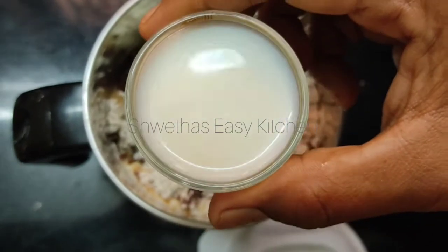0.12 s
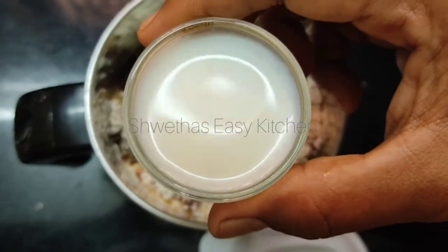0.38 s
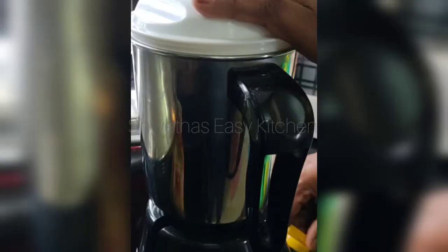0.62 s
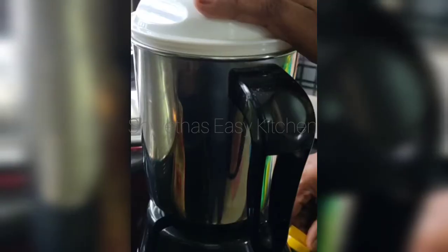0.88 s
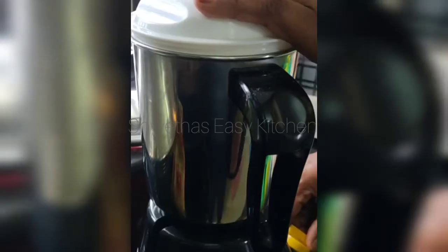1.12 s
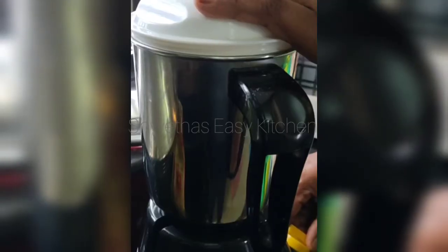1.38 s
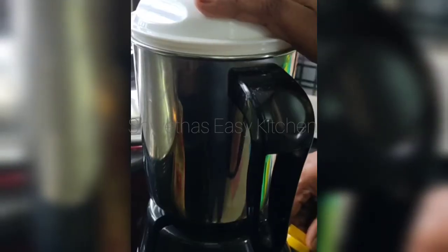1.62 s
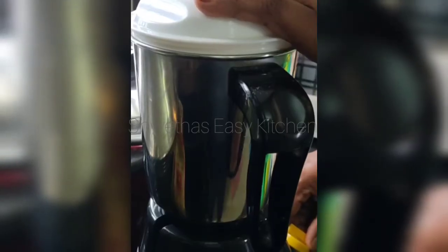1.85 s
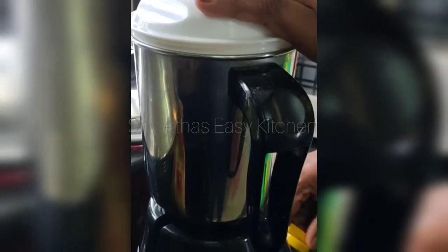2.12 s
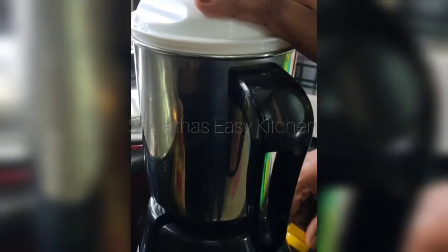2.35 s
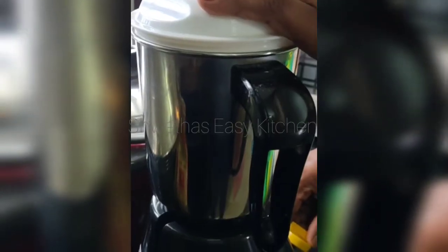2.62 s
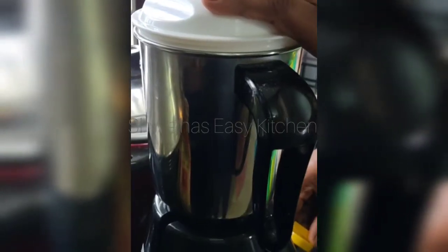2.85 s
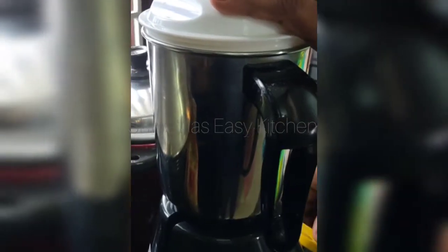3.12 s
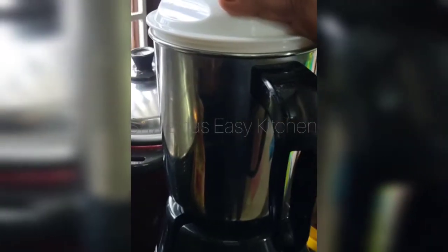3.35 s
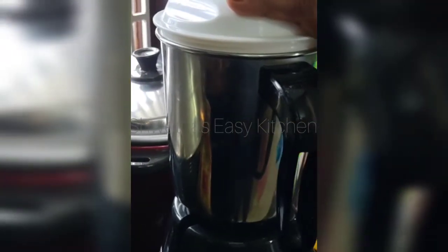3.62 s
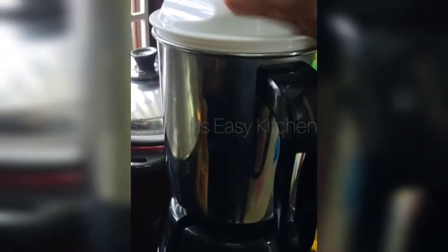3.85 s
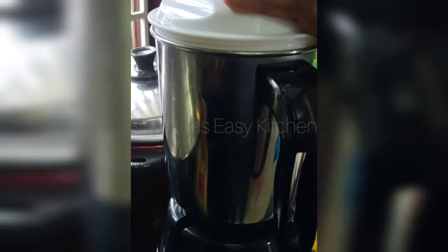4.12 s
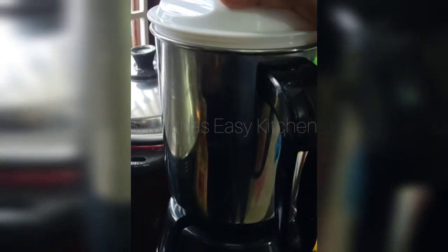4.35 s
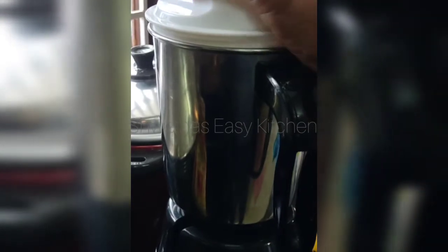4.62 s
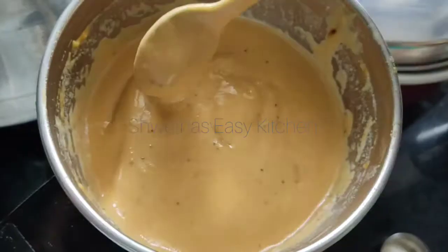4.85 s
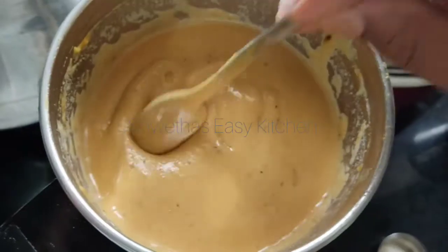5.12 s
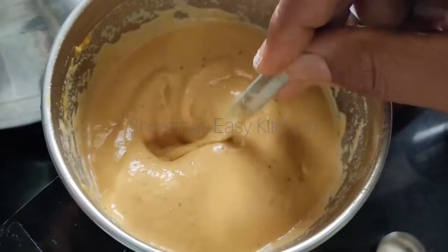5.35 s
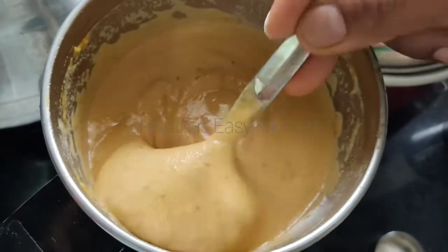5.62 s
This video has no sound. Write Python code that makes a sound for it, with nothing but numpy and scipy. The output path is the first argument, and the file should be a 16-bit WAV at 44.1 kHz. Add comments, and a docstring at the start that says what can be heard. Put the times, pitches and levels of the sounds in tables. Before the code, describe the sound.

From 0 to 0.6 s there is only quiet kitchen air: low murmur, faint hiss and a wavering hum near 190 Hz, strongest at the very start. After a tiny silent gap, a mixer grinder fades in quickly at 0.64 s, already at speed and close to a handheld stereo microphone. A broad, rough motor drone mixes with steel jar resonance, wet batter slosh and bright buzzing grit pulsing about 216 times a second. Lumps make it surge irregularly, with small hard clicks, notably near 2.9 s. It switches off at 3.0 s, coasting down within a fraction of a second with a soft jolt, restarts at 3.24 s, and stops at 4.19 s, fading quickly into room air. A faint bright rustle comes near 4.67 s. After a short silence, quiet, slightly hissier air fades in from 4.76 s, with one tiny, high spoon tick at 5.17 s.

```python
"""A low murmur, a faint hiss and a wavering hum of quiet kitchen air come first; a mixer grinder then runs
in two bursts near a two-port handheld microphone, and quiet air with one spoon tick closes the scene.
The motor drone and steel jar are noise shaped by resonances; slosh and grit are noise puffed once a turn.
All four coast down after each burst. The tick is damped sines with noise cracks, the rustle a treble swell.
Short silent gaps part three passages, each with its own fade-in."""
import sys
import numpy as np
from scipy import signal
from scipy.fft import rfft, irfft, next_fast_len
from scipy.io import wavfile
from scipy.ndimage import uniform_filter1d, minimum_filter1d, map_coordinates

SR = 44100
rng = np.random.default_rng(int(sys.argv[2]) if len(sys.argv) > 2 else 0)


def persist_wave(psi):
    """Save psi, clipped to +-1, as 16-bit WAV."""
    counts = np.round(np.clip(psi, -1, 1) * 32767).astype(np.int16)
    wavfile.write(sys.argv[1], SR, np.atleast_2d(counts).T)


def convert_level_to_amplitude(level_db):
    """Map a level in decibels to its linear amplitude factor."""
    exponent = np.asarray(level_db, float) / 20
    return 10 ** exponent


N = 252516  # samples


def unit(x):
    """Normalisation to rms 1."""
    return x / np.sqrt(np.mean(x ** 2) + 1e-20)


def along(points, hz):
    """Linear interpolation of (f/Hz, value) points on a logarithmic frequency axis."""
    f, v = np.transpose(points)
    return np.interp(np.log(hz + 1), np.log(f + 1), v)


def wobble(rate):
    """Slow random modulation: a spline through random knots, rate knots a second."""
    return map_coordinates(rng.standard_normal(int(N * rate / SR) + 4), [np.arange(N) * rate / SR])


def bump(s, half):
    """Gaussian envelope of height 1, centred at s."""
    return np.exp(-((np.arange(N) / SR - s) / half) ** 2)


def filtered(x, response):
    """Linear filtering: the spectrum of x times a complex frequency response."""
    m = next_fast_len(N + SR // 2)
    spectrum = rfft(x, m) * response(np.fft.rfftfreq(m, 1 / SR))
    return irfft(spectrum, m)[..., :N]


def noise(patchy_db):
    """Gaussian noise pair whose time-frequency patches share one random gain."""
    z = signal.stft(rng.standard_normal((2, N)), nperseg=512)[2]
    field = uniform_filter1d(rng.standard_normal(z.shape[1:]), size=6, axis=0)
    field = uniform_filter1d(field, size=8, axis=1)
    return signal.istft(z * convert_level_to_amplitude(patchy_db * unit(field)), nperseg=512)[1][:, :N]


def humps(modes, hz):
    """Lorentzian resonance: summed power of (f/Hz, width/Hz, level/dB) modes."""
    return sum(convert_level_to_amplitude(2 * db) / (1 + (2 * (hz - c) / w) ** 2) for c, w, db in modes)


def ring(events, life, attack):
    """Free decay of modes (t/s, level/dB, f/Hz): damped sines losing 60 dB in life seconds."""
    out, t = np.zeros(N + SR), np.arange(SR // 4) / SR
    for s, db, hz in events:
        envelope = convert_level_to_amplitude(db - 60 * t / life) * (1 - np.exp(-t / attack))
        out[round(s * SR):][:len(t)] += envelope * np.sin(2 * np.pi * hz * t)
    return out[:N]


def cracks(events, life):
    """Impulsive excitation at (t/s, level/dB): stereo noise losing 60 dB in life seconds."""
    out, t = np.zeros((2, N + SR)), np.arange(SR // 20) / SR
    for s, db in events:
        out[:, round(s * SR):][:, :len(t)] += convert_level_to_amplitude(db - 60 * t / life) * rng.standard_normal((2, len(t)))
    return out[:, :N]


# Correlation of left and right port: (f/Hz, likeness)
LIKENESS = [(40, .5), (100, .85), (200, .95), (450, .87), (640, .5), (800, .75), (1200, .4), (1600, .65),
            (2200, .25), (8000, .25)]
# Phase by which left leads right: (f/Hz, phase/rad)
PHASE_LEAD = [(0, -0.5), (780, 0.2), (2330, -5.5), (4910, -13.0), (5250, -14.5), (6290, -17.5),
              (7240, -17.5), (7670, -19.5), (10300, -16.5), (10900, -16.5), (11600, -43.5), (14100, -38.5),
              (14700, -44.5), (15300, -34.5)]
# Left minus right: (f/Hz, level/dB)
BALANCE = [(60, -16.5), (99, 0.5), (160, 0.5), (270, 3.5), (450, 7), (740, -2), (1220, 2.5), (2010, -1.5),
           (3330, 2.5), (5500, -1.5), (9080, 1), (15000, -5)]


def at_ports(pair, colour, alike=LIKENESS, lead=PHASE_LEAD, sides=BALANCE):
    """Interaural-style cues: two drives mixed to a set coherence, phase lead and balance; mid rms 1."""
    turn = lambda hz: np.arccos(np.clip(along(alike, hz), 0, 1)) / 2
    mid, side = filtered(pair, lambda hz: colour(hz) * [np.cos(turn(hz)), np.sin(turn(hz))])
    # each port takes half of the level and phase difference
    half = lambda hz: convert_level_to_amplitude(along(sides, hz) / 2) * np.exp(.5j * np.interp(hz, *np.transpose(lead)))
    both = filtered([mid + side, mid - side], lambda hz: [half(hz), 1 / half(hz)])
    return both / np.std(both.mean(axis=0))


def diffuse(pair, colour):
    """Diffuse field: coherence of the ports vanishes in the treble, with no lead and no imbalance."""
    coherence = [(60, .5), (290, .8), (700, .3), (1400, 0)]  # (f/Hz, likeness)
    return at_ports(pair, colour, coherence, lead=[(0, 0), (1, 0)], sides=[(1, 0)])


# Room murmur, relative spectral density: (f/Hz, level/dB)
MURMUR_SPECTRUM = [(35, -33), (60, -12.5), (176, -6.5), (210, -12.5), (275, -5), (429, -9.5), (592, -18),
                   (696, -14), (1500, -24.5), (1950, -44.5), (3300, -120)]


def murmur():
    """Coloured noise: the low background of the room, rms 1."""
    return diffuse(noise(patchy_db=1.5), lambda f: convert_level_to_amplitude(along(MURMUR_SPECTRUM, f)))


# Room hiss, relative spectral density: (f/Hz, level/dB)
HISS_SPECTRUM = [(300, -20), (900, -8.5), (2000, -3), (5000, -11), (9000, -11), (16000, -5.5)]


def hiss():
    """Coloured noise: the faint treble background, rms 1."""
    return diffuse(noise(patchy_db=2.2), lambda f: convert_level_to_amplitude(along(HISS_SPECTRUM, f)))


def draught():
    """Turbulent pressure noise: slow air on the ports, falling off above 14 Hz, rms 1."""
    return diffuse(noise(patchy_db=1.5), lambda f: f / (f + 3) / (1 + (f / 14) ** 2) ** 0.76)


def hum():
    """Frequency and amplitude modulation of a sine: a far appliance, in the first passage only."""
    t = np.arange(N) / SR
    # settled rms level, louder opening, waver
    hum_db = -59 + 11 * np.exp(-(t / .058) ** 4) + 4.5 * wobble(27)
    phase = 2 * np.pi * np.cumsum(186 * (1 + 0.022 * wobble(26.5))) / SR  # wavers about 186 Hz
    return np.sqrt(2) * convert_level_to_amplitude(hum_db) * np.sin(phase) * (t <= PASSAGES[0][1])


# Air of each passage: (murmur level/dB, hiss level/dB before a common trim, left minus right level/dB)
AIR_LEVELS = [(-54.5, -56, 4.3), (-52.5, -57, 6), (-52, -49.5, 3.5)]


def kitchen():
    """Superposition of murmur, hiss, draught and hum, with a level balance for each passage."""
    passage = np.searchsorted([p[1] for p in PASSAGES[:-1]], np.arange(N) / SR)
    murmur_db, hiss_db, pan_db = np.array(AIR_LEVELS)[passage].T
    air = convert_level_to_amplitude(murmur_db) * murmur() + convert_level_to_amplitude(hiss_db - 4.5) * hiss() + convert_level_to_amplitude(murmur_db - 2.5) * draught()
    return (air + hum()) * convert_level_to_amplitude([pan_db / 2, -pan_db / 2])


# Lumps of food meet the blade: (t/s, level/dB, half length/s)
LUMPS = [(.972, 2.4, .04), (1.098, 2.6, .018), (1.24, 1.3, .11), (1.444, 1.9, .05), (1.62, 1.2, .09),
         (1.89, 1.4, .1), (2.062, 3, .022), (2.248, 2.4, .035), (2.355, 2.6, .032), (2.42, 1.5, .035),
         (2.665, 1.9, .047), (2.87, 1.3, .07), (3.397, 2.7, .07), (3.54, 2, .06), (3.788, 2.1, .026),
         (3.96, 2.2, .06), (4.166, 2.5, .042)]


def surges():
    """Load modulation: the swell in dB that each lump adds to every running layer."""
    return sum(db * bump(s, half) for s, db, half in LUMPS)


# The switch: (on t/s, off t/s, drag of the batter as a factor on the coasting loss)
SWITCHING = [(0.3, 2.99, .72), (3.241, 4.188, 1.0)]


def follow(law, surge_db):
    """Rotational inertia: gain spins up at switch-on, drops quickly and coasts down after switch-off."""
    running_db, rise, drop_db, coast_db = law
    t, power = np.arange(N) / SR, 0
    for on, off, drag in SWITCHING:
        idle = np.maximum(t - off, 0)
        up = 1 - np.exp(-(np.maximum(t - on, 0) / rise) ** 1.5)
        quick_drop = drop_db * (1 - np.exp(-idle / .042))
        power = power + (up * convert_level_to_amplitude(-quick_drop - drag * coast_db * idle)) ** 2
    start, end, _ = PASSAGES[1]  # opens with the motor already on
    return convert_level_to_amplitude(running_db + surge_db) * np.sqrt(power) * (t > start) * (t < end)


# Base and counter modes: (f/Hz, width/Hz, level/dB over the broad drone)
BASE_MODES = [(116, 8.9, 14), (190, 12, 15.5), (225, 8.4, 5.5), (293.7, 23.4, 9.5), (340, 24, 11.5),
              (403, 34, 8.5), (580, 15, 9), (778, 130, 6), (902, 16, 7.5), (1182, 65, 6.5), (1276, 22, 5.5),
              (1543, 18, 3), (1763, 69, 9)]
# Broad drone, relative spectral density: (f/Hz, level/dB)
DRONE_SPECTRUM = [(20, -33), (60, -24.5), (120, -11), (250, -3.5), (480, -4), (640, -4.5), (1000, -0.5),
                  (1600, 0), (2500, -11.5), (4000, -39.5), (20000, -88)]
# (running level/dB, spin-up/s, quick drop/dB, coasting loss in dB/s at drag 1)
DRONE_SWITCH = (-21.3, .04, 2.5, 76)


def drone(load, surge_db):
    """Forced vibration: broad motor noise drives the resonances of base and counter."""
    body = lambda f: convert_level_to_amplitude(along(DRONE_SPECTRUM, f)) * np.sqrt(1 + humps(BASE_MODES, f))
    drive = convert_level_to_amplitude(0.55 * load + 0.6 * wobble(45)) * noise(patchy_db=0.5)
    return follow(DRONE_SWITCH, surge_db) * at_ports(drive, body)


# Steel jar modes: (f/Hz, width/Hz, relative level/dB)
JAR_MODES = [(373, 14, -8.5), (460, 11.6, -0.5), (1082, 9.7, 1), (1078, 42, -7.5), (1180, 14, -13.5),
             (1784, 19, -9)]
# (running level/dB, spin-up/s, quick drop/dB, coasting loss in dB/s at drag 1)
JAR_SWITCH = (-27, .04, 1.5, 64)


def jar(surge_db):
    """Modal resonance: noise excites the jar, with uneven strength as the wall is struck unevenly."""
    colour = lambda f: np.sqrt(humps(JAR_MODES, f)) * f * f / (f * f + 250 ** 2)
    ringing = at_ports(noise(patchy_db=0.3), colour)
    return follow(JAR_SWITCH, surge_db) * ringing * convert_level_to_amplitude(3 * wobble(19))


def puffs():
    """Periodic amplitude modulation: one decaying puff a turn, of random strength."""
    shaft_hz = 215.9 * (1 + .07 * wobble(30))
    turns = np.cumsum(shaft_hz) / SR
    hard = rng.exponential(size=int(turns[-1]) + 1)  # turns differ in how much grit they throw
    return 0.74 + hard[turns.astype(int)] * 0.8 * np.exp(-5.5 * (turns % 1))


# Batter slosh, relative spectral density: (f/Hz, level/dB)
SLOSH_SPECTRUM = [(800, -63), (1900, -6.5), (2600, 0), (3600, -1.5), (5500, -10), (8000, -11.5),
                  (16000, -22.5)]
# (running level/dB, spin-up/s, quick drop/dB, coasting loss in dB/s at drag 1)
SLOSH_SWITCH = (-29.2, .04, 8, 66)


def slosh(load, puff, surge_db):
    """Modulated flow noise: batter carries a softened form of the puffs."""
    drive = convert_level_to_amplitude(0.36 * load) * puff ** 0.44 * noise(patchy_db=1.5)
    return follow(SLOSH_SWITCH, surge_db) * at_ports(drive, lambda f: convert_level_to_amplitude(along(SLOSH_SPECTRUM, f)))


# Flung grit, relative spectral density: (f/Hz, level/dB)
GRIT_SPECTRUM = [(1000, -47.5), (4000, -14.5), (6000, -2), (10000, -0.5), (16000, 0.5)]
# (running level/dB, spin-up/s, quick drop/dB, coasting loss in dB/s at drag 1)
GRIT_SWITCH = (-29.4, .042, 14, 115)


def grit(load, puff, surge_db):
    """Modulated impact noise: the blade flings grit at the wall in full puffs."""
    drive = convert_level_to_amplitude(0.47 * load) * puff * noise(patchy_db=0.7)
    return follow(GRIT_SWITCH, surge_db) * at_ports(drive, lambda f: convert_level_to_amplitude(along(GRIT_SPECTRUM, f)))


# Hard bits on the jar wall: (t/s, relative level/dB)
HARD_BITS = [(1.059, -9.5), (1.2281, -10), (1.736, -11.5), (1.8402, -5), (1.9051, -9), (1.9275, -6.5),
             (2.0492, -8.5), (2.1241, -6), (2.2584, -3.5), (2.622, -7.5), (2.902, -5), (2.9183, 0),
             (3.8292, -8)]


def chips():
    """Impact radiation: short noise bursts, high-passed near 5 kHz."""
    return convert_level_to_amplitude(-6.5) * filtered(cracks(HARD_BITS, life=0.023), lambda f: f * f / (f * f + 5000 ** 2))


# The motor jolts the base at the switch: (t/s, relative level/dB)
SWITCH_JOLTS = [(3.018, -14), (3.240, -20), (3.249, -11.5), (4.18, -20)]


def jolts():
    """Impulse response of modes: a soft push rings the low modes of the base."""
    low_modes = [(hz, level) for hz, _, level in BASE_MODES if 150 < hz < 450]
    events = [(s, db + level - 14.5, hz) for s, db in SWITCH_JOLTS for hz, level in low_modes]
    return ring(events, life=0.11, attack=0.0045) * convert_level_to_amplitude([[1.5], [-1.5]])


def grinder():
    """Superposition of layers under a common load: drone, jar, slosh, grit, chips and jolts."""
    surge_db = surges()
    load = wobble(11)  # shared by drone, slosh and grit
    puff = puffs()
    running = drone(load, surge_db) + jar(surge_db) + slosh(load, puff, surge_db) + grit(load, puff, surge_db)
    return running + chips() + jolts()


# Brief bright rustle by the lid: (t/s, level/dB, half length/s)
LID_RUSTLE = (4.665, -56, .025)


def rustle():
    """Friction noise: high-passed noise under a Gaussian swell."""
    s, db, half = LID_RUSTLE
    return convert_level_to_amplitude(db) * bump(s, half) * unit(filtered(noise(patchy_db=2.5), lambda f: f / (f + 3000)))


# Spoon on the rim, a tick and its bounces: (t/s, relative level/dB, f/Hz)
SPOON_TICKS = [(5.1665, -18.5, 9350), (5.1702, -25, 9260), (5.1745, -36, 9100)]


def spoon():
    """Impact and reverberation: damped sines nearer the left port, thin cracks and a short room tail."""
    tick = ring(SPOON_TICKS, life=0.0072, attack=.0002) * convert_level_to_amplitude([[3], [-3.5]])
    strikes = [(s, db + 1) for s, db, _ in SPOON_TICKS]
    crack = filtered(cracks(strikes, life=.02), lambda f: (f / 14000) ** 3)
    direct = tick + crack
    t = np.arange(SR // 8) / SR
    tail = rng.standard_normal((2, len(t))) * convert_level_to_amplitude(-60 * t / 0.2 - 36)  # 60 dB decay in 0.2 s
    return convert_level_to_amplitude(-6) * (direct + signal.fftconvolve(direct, tail, axes=1)[:, :N])


def scene():
    """Linear superposition of all sources of the kitchen."""
    return kitchen() + grinder() + rustle() + spoon()


# Left and right microphone port resonance: (f/Hz, width/Hz)
PORT_MODES = [(8890, 1870), (7880, 1350)]
# Treble fade of both ports: (f/Hz, level/dB)
PORT_FADE = [(8500, 0), (9400, -4.5), (10000, -17), (10600, -22.5), (12500, -11), (14300, -14.5),
             (15500, -18.5)]


def through_ports(x):
    """Cavity resonance: each port rings near 8 to 9 kHz, with a fade above."""
    resonance = lambda f, c, w: c * c / (c * c - f * f + 1j * f * w)
    return filtered(x, lambda f: [resonance(f, c, w) * convert_level_to_amplitude(along(PORT_FADE, f)) for c, w in PORT_MODES])


# Passages joined with silent gaps: (start t/s, end t/s, fade-in/s)
PASSAGES = [(-1, .605, .3), (.636, 4.7, .3), (4.76, 6, .36)]


def joined(x):
    """Amplitude gating: sine fade-in for each passage, silence between."""
    t, gain = np.arange(N) / SR, 0
    for start, end, fade in PASSAGES:
        progress = np.clip((t - start + .026) / fade, 0, 1)  # 26 ms under way as the passage opens
        gain = gain + np.sin(np.pi / 2 * progress) * (t > start) * (t < end)
    return x * gain


def limited(x, top):
    """Peak limiting: the recorder ducks briefly around its highest peaks."""
    need = np.minimum(1, top / (np.abs(x).max(axis=0) + 1e-9))
    return x * uniform_filter1d(minimum_filter1d(need, size=301), size=301)


def low_pass(x):
    """Removes everything above the highest recorded frequency."""
    return signal.sosfilt(signal.butter(12, 15800, fs=SR, output="sos"), x)


def record(dry):
    """Signal chain in series: port resonance, gating of the passages, peak limiting."""
    mix = limited(joined(through_ports(dry)), top=.92)
    return low_pass(mix)


dry = scene()
out = record(dry)
persist_wave(out)
```